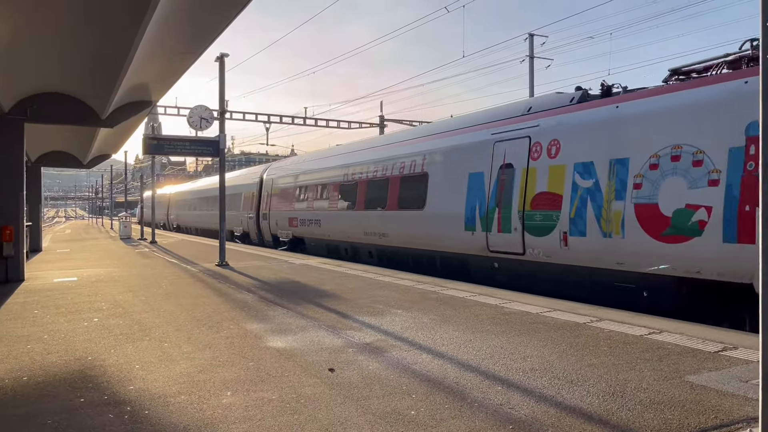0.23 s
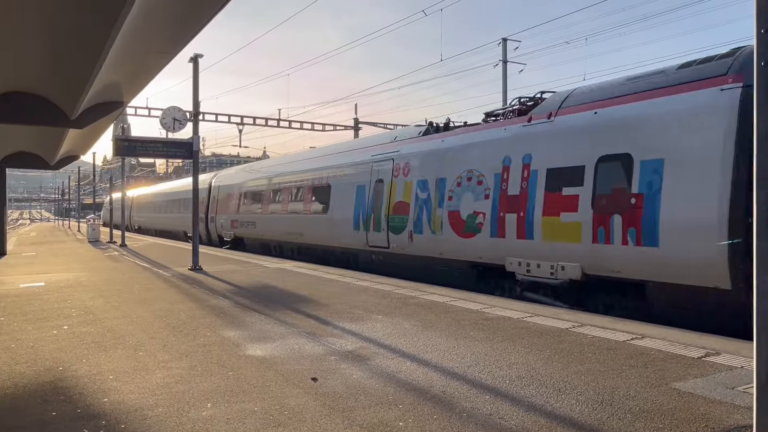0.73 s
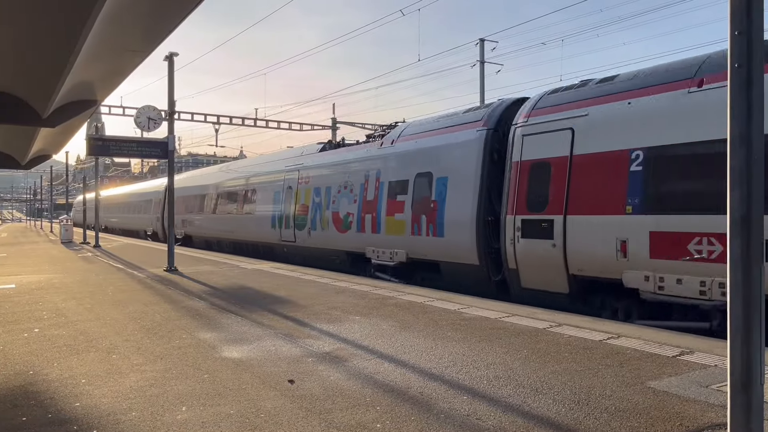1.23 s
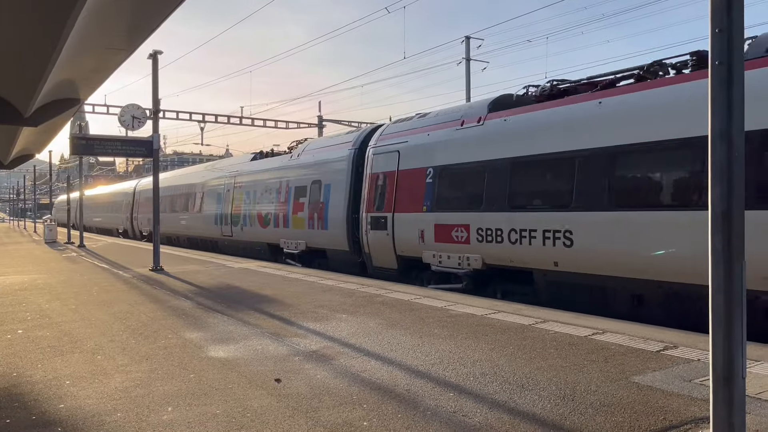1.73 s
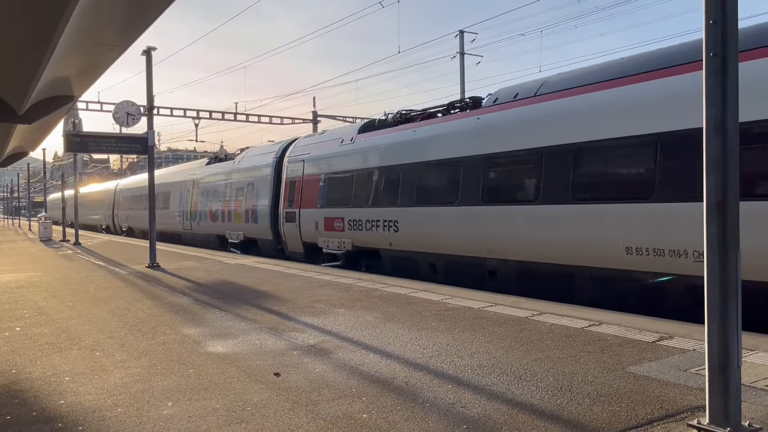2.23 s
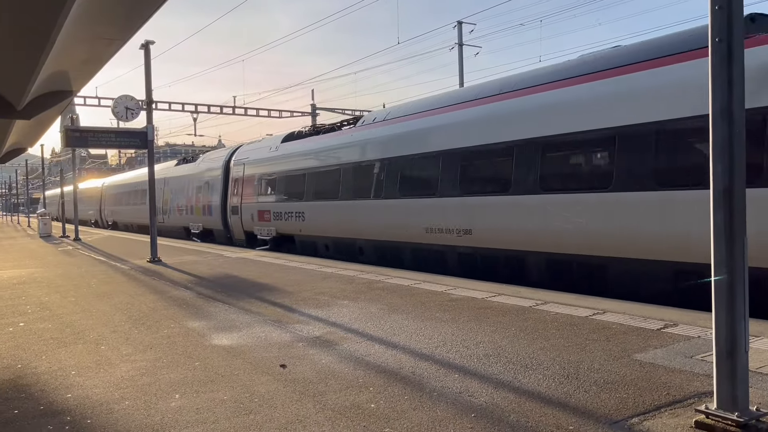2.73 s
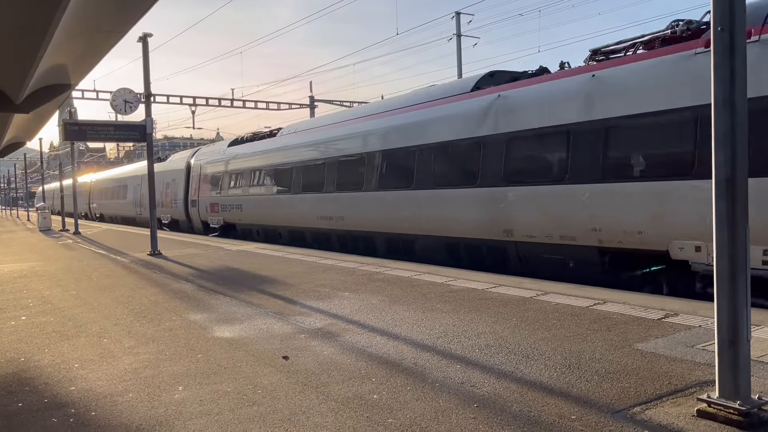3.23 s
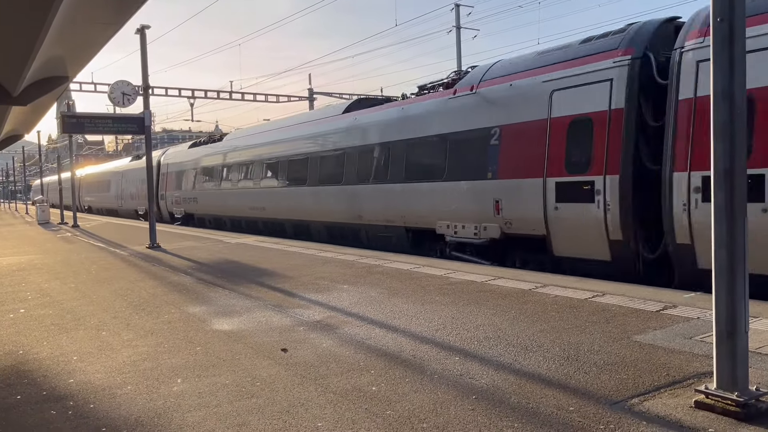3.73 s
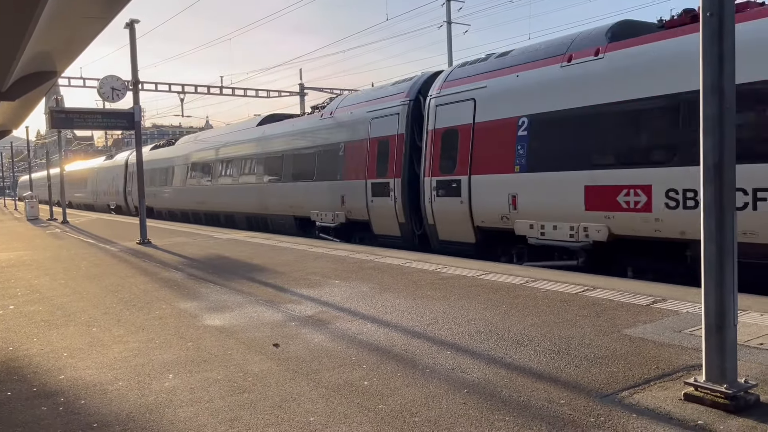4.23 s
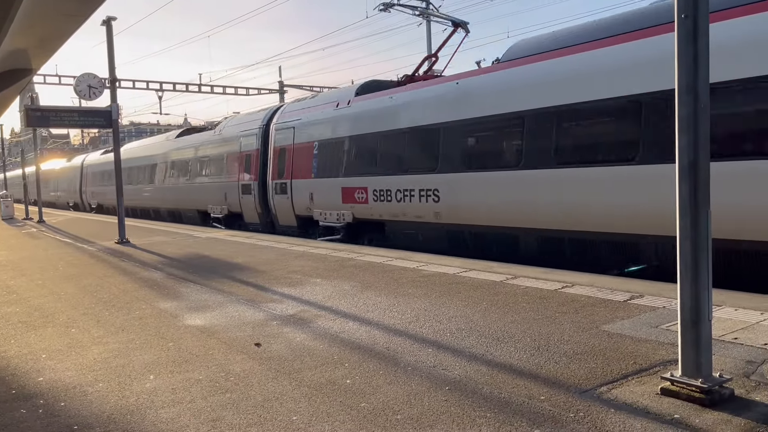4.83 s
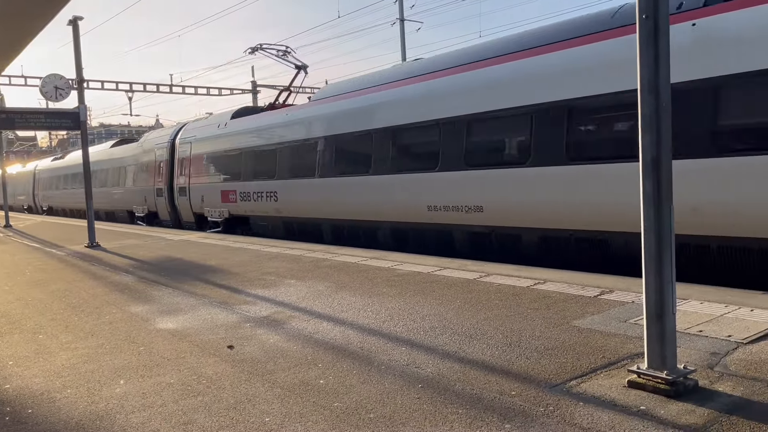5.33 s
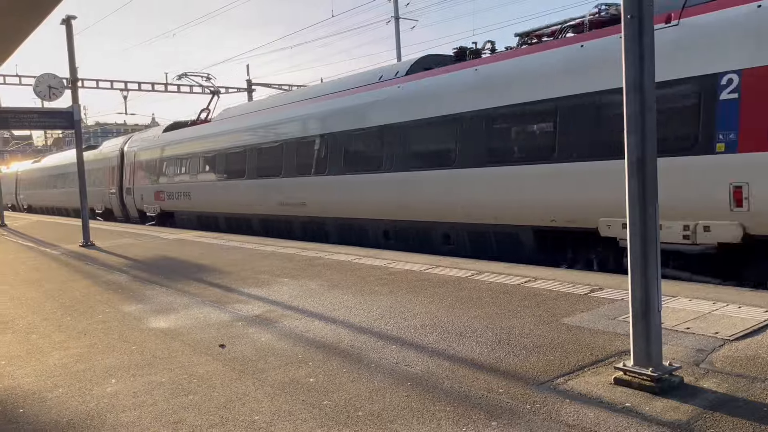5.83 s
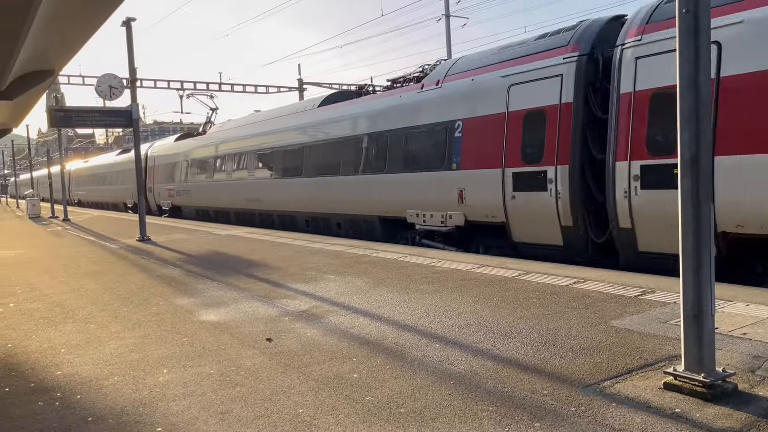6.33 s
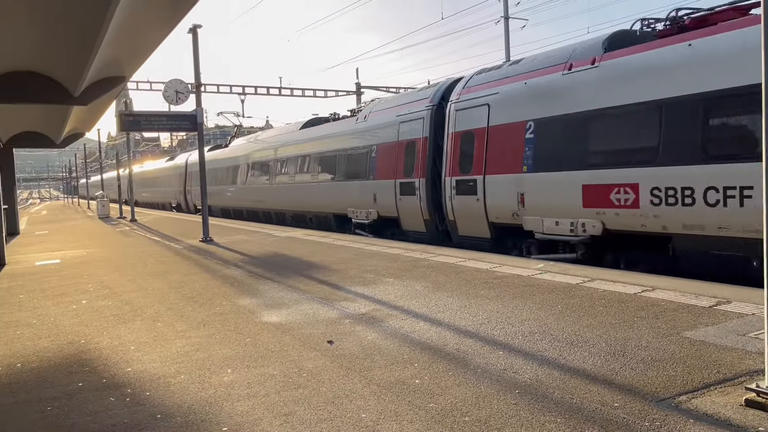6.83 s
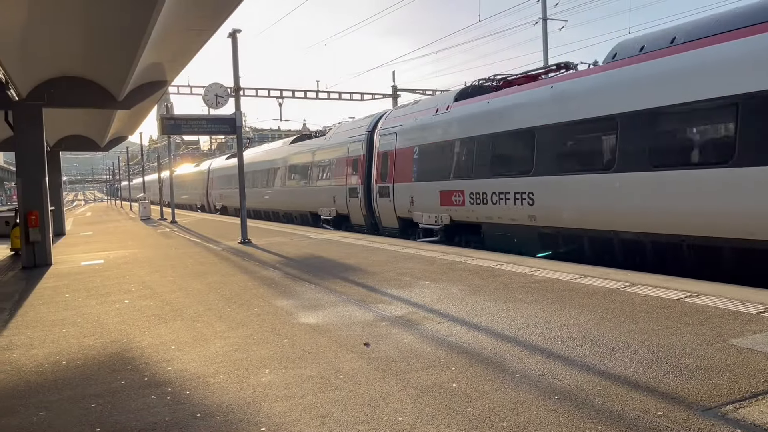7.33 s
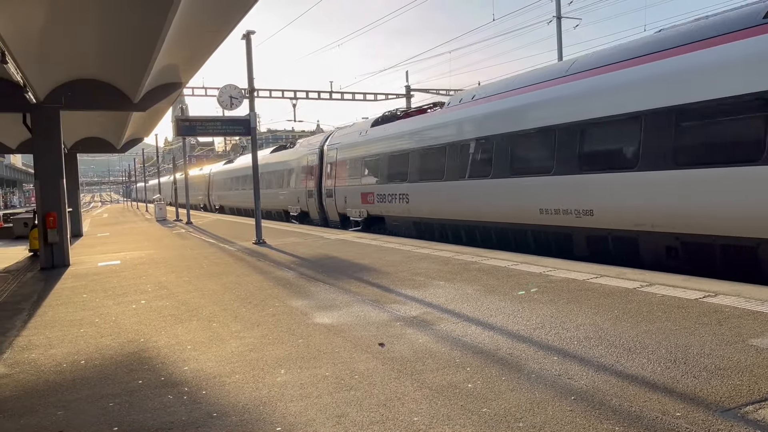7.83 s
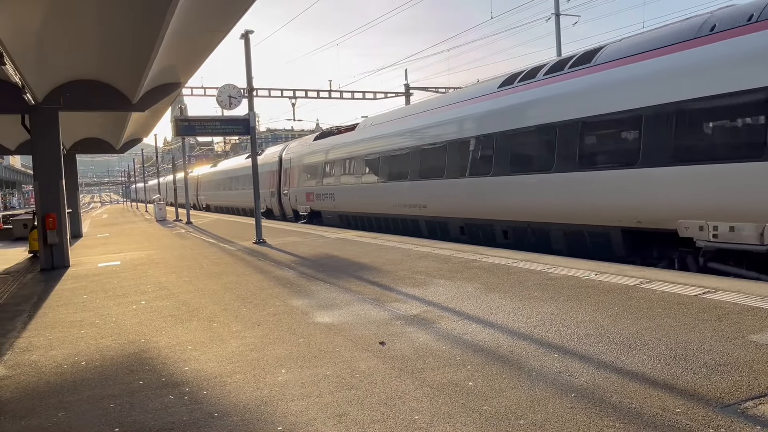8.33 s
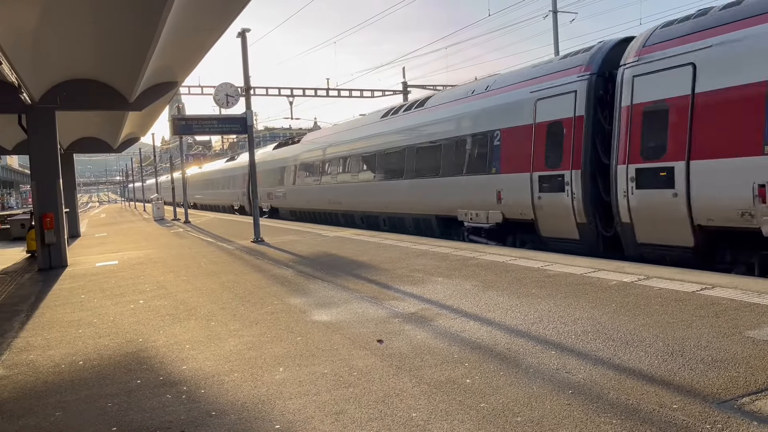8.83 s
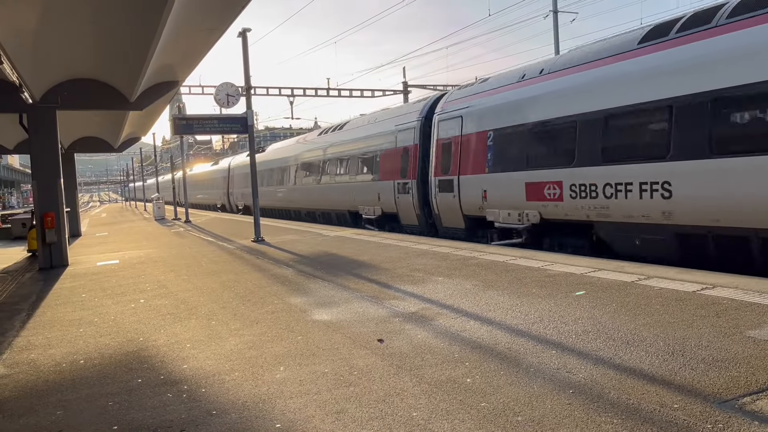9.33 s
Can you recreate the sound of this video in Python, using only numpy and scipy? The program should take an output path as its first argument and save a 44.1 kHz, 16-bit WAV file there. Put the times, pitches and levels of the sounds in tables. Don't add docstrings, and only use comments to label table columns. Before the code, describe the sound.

An electric train gathers speed past an open platform, its gear whine climbing steadily over a broad wheel and rail roar, growing louder.

```python
import sys
import numpy as np
from scipy import signal
from scipy.fft import rfft, irfft, next_fast_len
from scipy.io import wavfile
from scipy.ndimage import uniform_filter1d

SR = 44100
rng = np.random.default_rng(int(sys.argv[2]) if len(sys.argv) > 2 else 0)


def boost(x):
    u = np.asarray(x, float) / 20
    return 10 ** u


def transcribe(signal):
    frames = np.atleast_2d(signal).T
    limited = np.clip(frames, -1, 1)
    pcm = np.round(limited * 32767).astype(np.int16)
    wavfile.write(sys.argv[1], SR, pcm)


N = 423360
T = np.arange(N) / SR
HZ = np.maximum(np.arange(N // 2 + 1) * SR / N, 1)


# time in seconds, gear tooth rate in Hz.
SPEED = [(0, 857), (1.0, 917.5), (2.4, 986.5), (3.6, 1049), (5.4, 1144), (6.3, 1183), (7.2, 1228),
         (8.4, 1270), (9.6, 1312)]
# centre in Hz, width in Hz, lift in dB.
CASING = [(890, 25, 4), (1150, 16, 5), (1188, 14, 12), (1233, 13, 9), (1293, 12, 13), (1340, 16, 6),
          (1405, 14, 8), (1650, 40, 3), (1938, 20, 10), (2038, 22, 12), (2100, 24, 4), (3560, 60, 3),
          (3720, 50, 3), (3880, 50, 4), (4200, 80, 4), (4400, 60, 4)]


def drive():
    teeth_turns = np.cumsum(in_time(SPEED)[0]) / SR
    casing_gain = peaks(CASING)
    return gears(teeth_turns, casing_gain) + motors(teeth_turns, casing_gain) + shaft()


GEAR_ORDERS = [1.001, 2.01, 3.001, 4.03]
# width as share of pitch, side strands in dB, their distance in multiples.
GEAR_SPREAD = [(.012, -6, .024), (.009, -7, .065), (.012, -3.5, .07), (.006, -9, .07)]
# time in seconds, mesh tone level in dB.
NEARNESS = [(0, -39.5), (.7, -39), (1.75, -50), (3.2, -45.5), (4.0, -50), (4.35, -42), (4.6, -48),
            (4.9, -43), (5.2, -39.5), (5.6, -35), (6.28, -33.5), (6.42, -27), (7.0, -26.5), (7.85, -28),
            (8.4, -27.5), (8.95, -29), (9.07, -27.5), (9.2, -27), (9.4, -23.5), (9.6, -27.5)]
# time in seconds, half length in seconds, lift in dB.
MESH_BLOOMS = [
    (5.38, .05, -1),
    (6.22, .04, 0),
    (6.59, 0.084, 4),
    (6.77, 0.096, 5.5),
    (7.36, 0.12, 0),
    (8.05, 0.079, 4),
    (8.8, .08, 6),
    (9.35, 0.049, 3.5),
    (9.48, 0.036, 6.5),
]
# time in seconds, half length in seconds, level in dB.
GEAR_PASSES = [
    [(.1, .2, -45), (.8, 0.96, -52), (2.4, 0.17, -49.5), (2.85, 0.43, -50), (3.4, 0.25, -55),
     (5.7, .2, -53), (6.8, 0.88, -45.5), (8.5, .3, -48), (9.6, 0.18, -47.5)],
    [(2.7, 0.25, -65.5), (3.9, 0.18, -60), (5.7, 0.31, -54.5), (6.7, 0.47, -43), (7.7, 0.85, -44),
     (9.1, 0.55, -40)],
    [(.2, 0.42, -57), (.9, .25, -61), (3.1, 0.42, -57), (3.8, 0.3, -55.5), (4.5, .25, -56.5),
     (5.5, .4, -60), (6.2, .6, -56.5)],
]


def gears(teeth_turns, casing_gain):
    gains = [boost(in_time(NEARNESS)[0] + swells(MESH_BLOOMS))]
    for k, rows in enumerate(GEAR_PASSES):
        gains.append(boost(1.1 * k + 0.8) * passes(rows))
    return sum(order_tone(teeth_turns, multiple, spread, gain, casing_gain)
               for multiple, spread, gain in zip(GEAR_ORDERS, GEAR_SPREAD, gains))


SLOT_ORDERS = [1.44, 1.58, 1.87, 3.472]
# width as share of pitch, side strands in dB, their distance in multiples.
SLOT_SPREAD = [(.011, -10, .04), (.014, -3, .04), (.011, -6, .05), (.018, -2, .1)]
# time in seconds, half length in seconds, level in dB.
MOTOR_PASSES = [
    [(4.65, 0.34, -50), (5.25, .1, -42.5), (5.6, 0.3, -42), (6.4, 0.71, -43.5), (7.4, 0.61, -45.5),
     (8.6, .3, -45), (9.3, 0.48, -44)],
    [(5.1, 0.093, -45), (5.7, 0.13, -49), (6.9, 0.8, -45.5), (7.4, .1, -40), (8.1, 0.3, -31.5),
     (8.47, .12, -27.5), (8.75, 0.3, -34.5), (9.27, 0.5, -36.5)],
    [(4.65, .5, -57), (8.4, 0.67, -45.5), (9.2, .4, -47)],
    [(5.9, .5, -50), (6.9, 0.34, -47.5), (7.8, 0.91, -48.5), (8.4, 0.18, -48.5), (9.25, 0.39, -46)],
]


def motors(teeth_turns, casing_gain):
    return sum(order_tone(teeth_turns, multiple, spread, passes(rows), casing_gain)
               for multiple, spread, rows in zip(SLOT_ORDERS, SLOT_SPREAD, MOTOR_PASSES))


# time in seconds, pitch in Hz.
SHAFT_HZ = [(6.5, 250), (6.95, 249.9), (7.4, 257.4), (8.0, 260), (8.4, 266.5), (8.85, 263.8), (9.3, 273.1),
            (9.6, 283)]
SHAFT_OVERTONES_DB = [0.5, -13, -21, -24]
# time in seconds, half length in seconds, level in dB.
SHAFT_SWELLS = [(6.6, .04, -25.5), (6.97, .07, -23.5), (7.2, 0.15, -26), (7.38, 0.022, -22),
                (7.49, 0.067, -16.5), (7.7, 0.052, -17.5), (7.87, 0.096, -19.5), (8.01, 0.054, -19.5),
                (8.16, 0.11, -19.5), (8.42, 0.12, -20.5), (8.65, 0.12, -22.5), (8.82, 0.18, -25.5),
                (9.1, 0.036, -20), (9.2, 0.018, -19.5), (9.34, .07, -20.5), (9.56, 0.12, -21.5)]


def shaft():
    turns = np.cumsum(in_time(SHAFT_HZ)[0]) / SR
    abreast_db = -((T - 7.45) / 0.3) ** 2
    drone = boost(SHAFT_OVERTONES_DB[0]) * chorus(turns, 11.0, steady=0.88)
    for k, db in enumerate(SHAFT_OVERTONES_DB[1:], 2):
        drone = drone + boost(db + abreast_db) * chorus(k * turns, 11.0 * k, steady=0.1)
    return passes(SHAFT_SWELLS) * drone


def order_tone(teeth_turns, multiple, spread, gain, casing_gain):
    share, side_db, apart = spread
    width_hz = share * multiple * 1150
    tone = chorus(multiple * teeth_turns, width_hz)
    for sign in (-1, 1):
        tone = tone + boost(side_db) * chorus((multiple + sign * apart) * teeth_turns, width_hz)
    return gain * evened(irfft(rfft(tone) * casing_gain, N))


# frequency in Hz, density in dB per Hz.
ROAR = [(20, -75), (45, -61), (70, -49), (160, -52), (400, -54.5), (650, -64.5), (1400, -69.5), (1750, -75),
        (2400, -79), (3200, -81), (4500, -84), (6000, -91.5), (11000, -100), (15000, -110)]
# centre in Hz, width in Hz, lift in dB.
WHEELS = [(90, 14, 1), (260, 53, 6.5), (358, 15, 3.5), (1620, 50, 0), (1690, 180, 2.5), (2047, 23, -2),
          (2288, 60, 6), (2554, 60, 3), (2890, 53, 4.5), (3500, 65, 5.5), (5020, 230, 3), (7100, 200, 1.5)]
# frequency in Hz, range it belongs to (0 rumble, 1 rail, 2 wheel, 3 hiss).
ROLLING_HZ = [(200, 0), (800, 1), (2500, 2), (6500, 2), (9500, 3), (11600, 3), (16400, 2)]
# time in seconds, half length in seconds, lift in dB.
BOGIES = [
    (.6, 0.38, 2.5),
    (1.6, 0.3, 0.5),
    (2.85, 0.18, 2),
    (3.6, 0.18, 2.5),
    (4.3, 0.51, 1.5),
    (5.3, 0.18, 1),
    (6.2, 0.61, 3),
    (7.0, 0.31, 1.5),
    (7.6, 0.35, 1.8),
    (8.3, .3, 2),
]
# time in seconds, half length in seconds, lift in dB.
VENTS = [
    (6.4, .3, 2),
    (8.7, 0.54, 8),
    (9.58, 0.27, 9),
    (8.25, .03, -0.5),
    (8.56, .03, 4.5),
    (8.71, .012, 11),
    (8.81, .03, 10.5),
    (8.87, .012, 10),
    (9.02, .02, 5),
]


def rolling():
    patchy_db, flutter_db = 1.5, 0.35
    start_db = np.c_[[-2, -3, -5, -5]]
    db_per_octave_of_speed = np.c_[[1.1, 9.6, 13.65, 5.5]]
    share_of_bogie_swell = np.c_[[0.97, 0.24, 0.23, 1.2]]

    noise = rfft(rng.standard_normal((2, N))) * boost(at_hz(ROAR, HZ)) * peaks(WHEELS) * np.sqrt(SR / 2)
    speed = in_time(SPEED)[0]
    ranges_db = start_db + db_per_octave_of_speed * np.log2(speed / speed[0])
    ranges_db = ranges_db + share_of_bogie_swell * swells(BOGIES)
    ranges_db[-1] += swells(VENTS)
    together = drift(22.0)[0]
    out = np.zeros((2, N))
    for step in np.arange(9, 29):
        centre_hz = 2 ** (step / 2)
        mask = np.clip(1 - np.abs(2 * np.log2(HZ) - step), 0, 1)
        place = at_hz(ROLLING_HZ, centre_hz)
        slow_db = np.clip(1 - np.abs(place - np.arange(4)), 0, 1) @ ranges_db
        bright = np.clip(np.log2(centre_hz / 5000), 0, 2)
        own_db = patchy_db * (1 - bright / 3) * drift(5.2)[0]
        common_db = flutter_db * bright / 2 * together
        out += boost(slow_db + own_db + common_db) * irfft(noise * mask, N)
    return out


# start in seconds, end in seconds, pitch in Hz, level in dB.
BOOMS = [
    (.3, .6, 272.6, -38.5),
    (1.1, 1.904, 263.7, -33),
    (2.6, 3.162, 265.4, -27),
    (3.15, 3.794, 271.5, -28.5),
    (3.35, 3.656, 203.2, -29),
    (5.2, 5.6, 273.7, -29.5),
    (5.7, 6.1, 265.8, -27),
    (6.299, 6.55, 264.6, -26),
    (6.8, 7.1, 248.8, -26.5),
]


def floor_booms():
    return sum(whistle(start, end, hz, hz, 3.4, db) for start, end, hz, db in BOOMS)


# start in seconds, end in seconds, pitch in Hz, level in dB.
RINGS = [
    (.4, .65, 2320, -56),
    (.72, 1.1, 2340, -50),
    (1.1, 2.4, 2320, -57),
    (3.0, 3.7, 1620, -54),
    (3.7, 4.7, 2030, -52.5),
    (7.2, 7.9, 2620, -50),
    (7.4, 8.4, 2347, -57),
]


def wheel_rings():
    return sum(whistle(start, end, hz, hz, 0.0094 * hz, db) for start, end, hz, db in RINGS)


# start in seconds, end in seconds, start pitch in Hz, end pitch
# in Hz, level in dB.
SLIDING_TONES = [
    (5.2, 6.8, 2300, 2480, -57),
    (6.7, 7.3, 4000, 4120, -46.5),
    (6.0, 7.1, 5100, 4980, -56),
    (6.8, 7.7, 8100, 7900, -70),
    (9.15, 9.4, 6330, 6420, -62),
    (9.45, 9.79, 6350, 6660, -60),
]


def sliding_tones():
    return sum(whistle(start, end, start_hz, end_hz, 0.015 * start_hz, db)
               for start, end, start_hz, end_hz, db in SLIDING_TONES)


# pitch in Hz as it comes near, width in Hz, level in dB.
INVERTER = [(6920, 60, -67), (8400, 60, -60), (9520, 80, -69), (10100, 160, -65), (11000, 240, -63),
            (12400, 300, -69), (14300, 50, -77)]


def inverter():
    start_s, end_s, sink_share = 8.15, 9.5, 0.037
    burst_db = 3.3 * drift(26.0)[0]
    return sum(whistle(start_s, end_s, hz, hz * (1 - sink_share), width_hz, db, burst_db)
               for hz, width_hz, db in INVERTER)


def whistle(start_s, end_s, start_hz, end_hz, width_hz, db, flicker_db=None):
    out = np.zeros((2, N))
    span = (T > start_s) & (T < end_s)
    along = (T[span] - start_s) / (end_s - start_s)
    turns = np.cumsum(start_hz + (end_hz - start_hz) * along) / SR
    level_db = db + (2.26 * drift(9.3, size=len(along))[0] if flicker_db is None else flicker_db[span])
    out[:, span] = boost(level_db) * np.sqrt(np.sin(np.pi * along)) * chorus(turns, width_hz)
    return out


def chorus(turns, width_hz, steady=0.):
    a, b, c, d = drift(width_hz, channels=4, size=len(turns))
    steady = np.clip(steady, 0, 1)
    keep, loose = np.sqrt(2 * steady), np.sqrt(1 - steady)
    cos, sin = np.cos(2 * np.pi * turns), np.sin(2 * np.pi * turns)
    first = (keep + loose * a) * cos + loose * b * sin
    second = loose * c * cos + (keep + loose * d) * sin
    return np.array([first, second])


def drift(rate_hz, channels=1, size=N):
    r = np.exp(-32 * np.pi * rate_hz / SR)
    draws = rng.standard_normal((channels, N // 16 + 3002))
    slow = rms_one(signal.lfilter([1], [1, -2 * r, r * r], draws)[:, 3000:])
    return np.array([np.interp(np.arange(size) / 16, np.arange(len(s)), s) for s in slow])


def passes(rows):
    return np.sqrt(sum((boost(db) / (1 + ((T - s) / half) ** 2)) ** 2 for s, half, db in rows))


def swells(rows):
    return sum(db * np.exp(-((T - s) / half) ** 2) for s, half, db in rows)


def peaks(modes):
    return boost(sum(db / (1 + (2 * (HZ - hz) / width) ** 2) for hz, width, db in modes))


def evened(x, span_s=0.11):
    power = uniform_filter1d(np.mean(x ** 2, axis=0), int(span_s * SR))
    return x / np.sqrt(power + 1e-12)


def rms_one(x):
    return x / np.sqrt(np.mean(np.abs(x) ** 2, axis=-1, keepdims=True) + 1e-20)


def in_time(rows):
    s, *columns = np.transpose(rows)
    return [np.interp(T, s, c) for c in columns]


def at_hz(points, hz):
    point_hz, value = np.transpose(points)
    return np.interp(np.log(hz), np.log(np.maximum(point_hz, 1)), value)


# frequency in Hz, likeness 0-1.
LIKENESS = [(40, 0.99), (140, 0.97), (300, 0.91), (500, 0.48), (850, 0.32), (1300, 0.32), (2000, 0.68),
            (3000, .52), (4000, 0.33), (5300, .2), (6300, 0.1), (7000, 1), (8000, 1), (14000, 0.7)]
# frequency in Hz, phase by which left leads in radians.
LEAD = [(0, 0), (170, -.3), (520, -.65), (860, -3.3), (1200, -2.3), (1600, -2.8), (1900, -5.9),
        (2900, -5.6), (4000, -5.1), (4800, -5.6), (5400, -8.4), (6400, -7.3), (8400, -9.42), (15700, -15.7)]
# frequency in Hz, left minus right in dB.
LEAN = [(60, 0), (300, 1.5), (600, 0.5), (900, -0.5), (1400, -2.5), (1900, 3.5), (2700, 0), (4400, 5),
        (5300, 8.5), (6700, 1), (8000, -0.5)]


def scene():
    mix = drive() + rolling() + floor_booms() + wheel_rings() + sliding_tones() + inverter()
    size = next_fast_len(N + 8192)
    hz = np.maximum(np.arange(size // 2 + 1) * SR / size, 1)
    shared, apart = rfft(mix, size)
    alike = np.clip(at_hz(LIKENESS, hz), 0, 1)
    shared = np.sqrt((1 + alike) / 2) * shared
    apart = np.sqrt((1 - alike) / 2) * apart
    lead_rad = np.interp(hz, *np.transpose(LEAD))
    turn = boost(at_hz(LEAN, hz) / 2) * np.exp(0.5j * lead_rad)
    return irfft(np.array([(shared + apart) * turn, (shared - apart) / turn]), size)[:, :N]


def roll_off(x):
    return signal.sosfilt(signal.butter(12, 15750, fs=SR, output="sos"), x)


def record(dry):
    return roll_off(dry)


dry = scene()
out = record(dry)
transcribe(out)
```